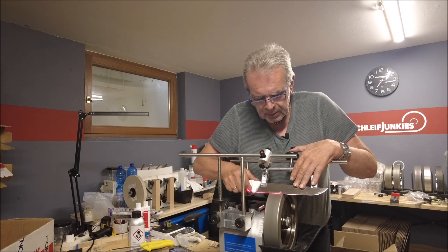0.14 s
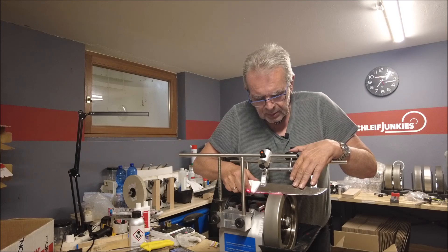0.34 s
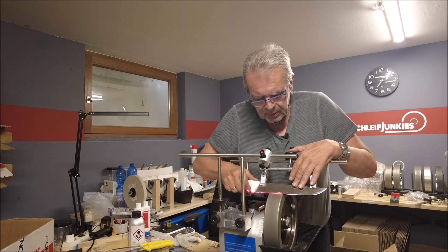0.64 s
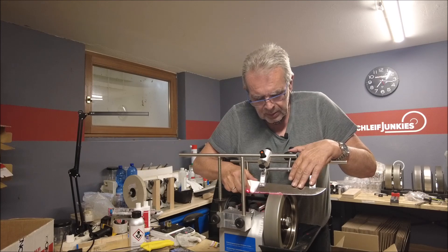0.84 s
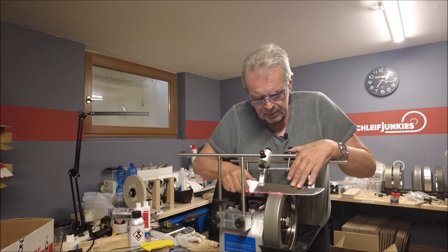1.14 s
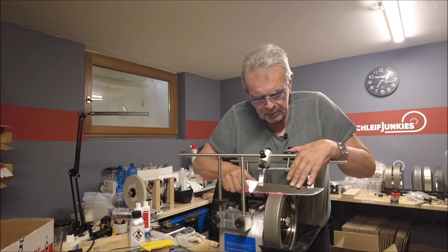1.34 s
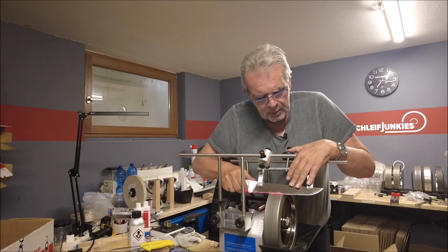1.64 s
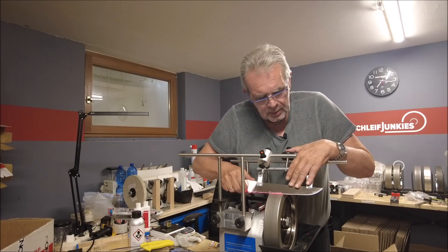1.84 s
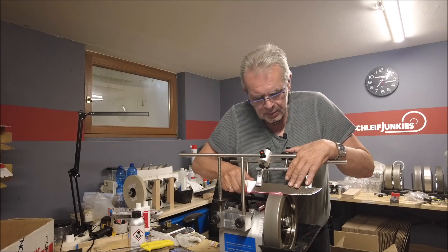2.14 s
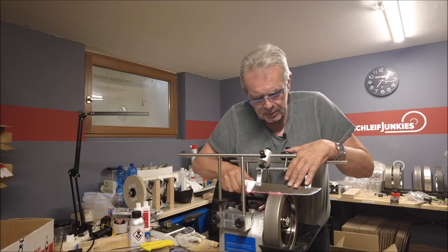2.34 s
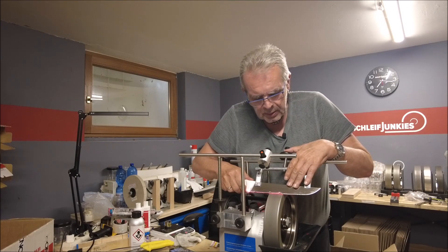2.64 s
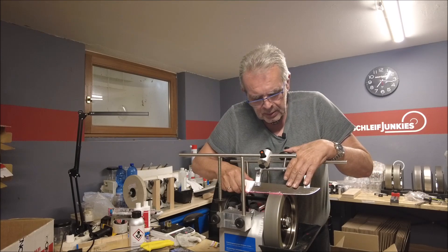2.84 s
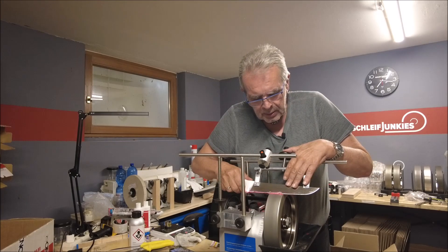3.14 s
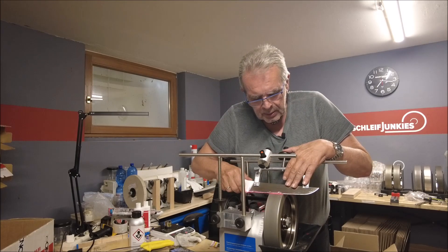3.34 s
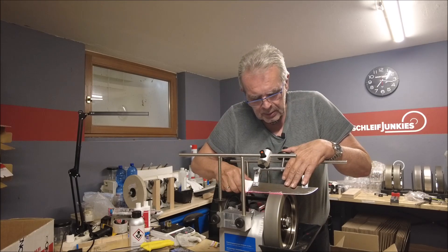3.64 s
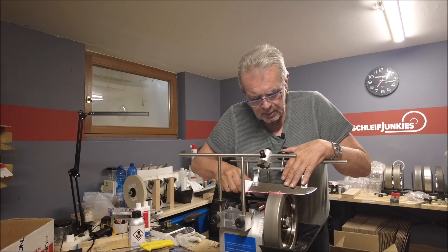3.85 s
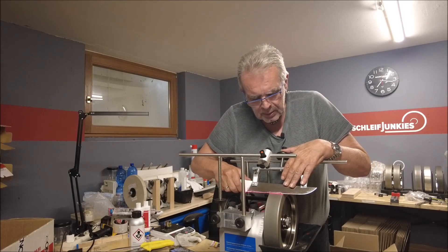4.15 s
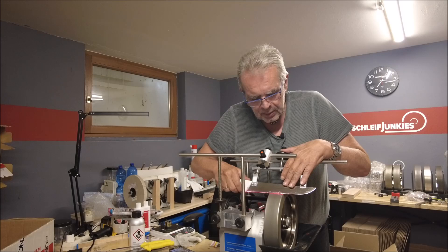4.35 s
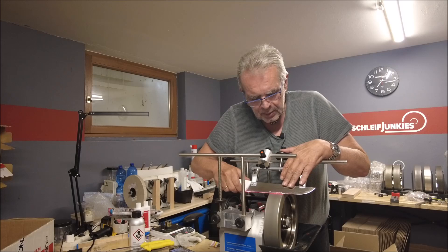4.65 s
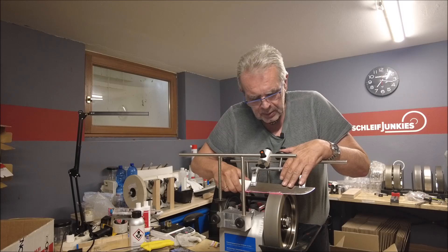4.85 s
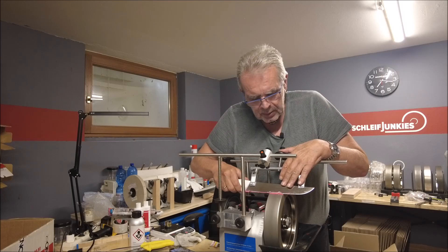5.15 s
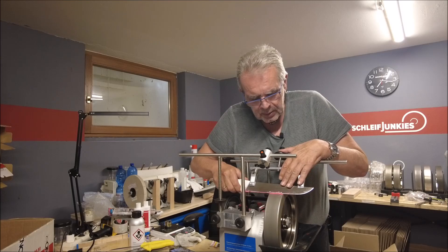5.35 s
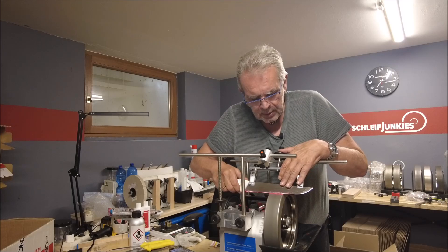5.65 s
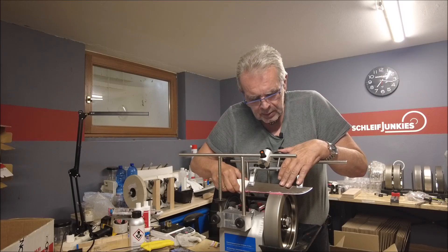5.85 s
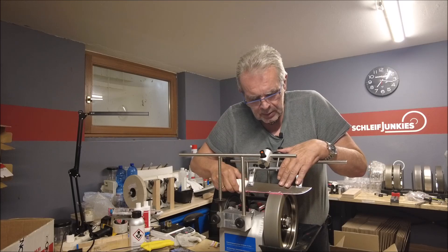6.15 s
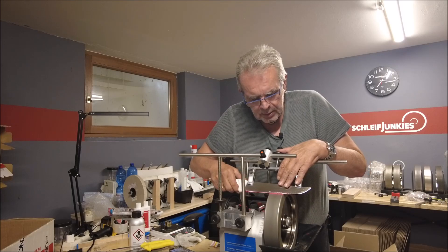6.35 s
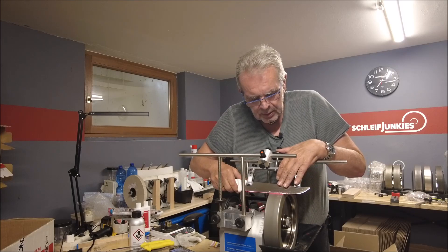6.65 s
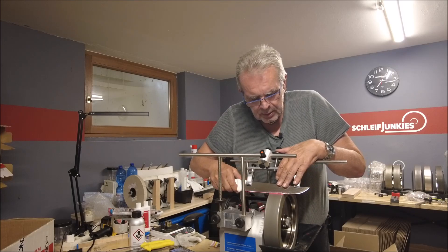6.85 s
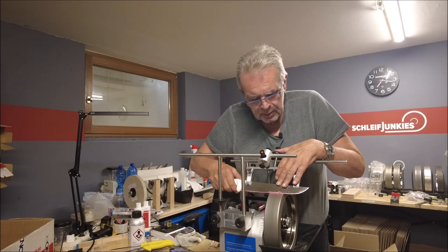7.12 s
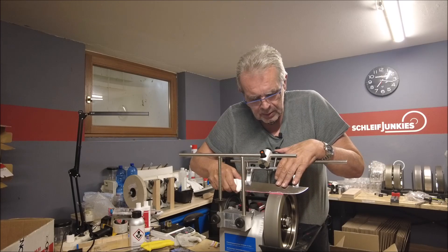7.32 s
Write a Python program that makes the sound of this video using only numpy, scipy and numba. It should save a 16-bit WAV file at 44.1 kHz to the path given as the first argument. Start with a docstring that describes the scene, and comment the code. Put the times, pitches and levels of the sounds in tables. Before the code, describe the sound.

A steel knife is ground on a turning wet stone for about seven and a half seconds, heard close and in mono in a small workshop. A bright wet hiss and gritty rasp run throughout, pulsing gently about every 0.7 seconds, with tiny recurring scratches and metallic resonances that swell and fade. A thin, chattering high whine is there from the start, peaks around 1 second and fades by 2. It returns near 3.8 seconds, rises in pitch, is loudest around 5.6 and wavers until it drops back at about 7. From around 5 seconds a lower blade tone glides upward, while a clear ringing note swells at the very end. Underneath, a low electric motor hum grows fuller between 2 and 4 seconds, along with soft housing rumble and faint room noise. A soft, dull double bump comes just after 4 seconds.

```python
"""A small workshop, where a long steel knife is drawn slowly across the stone of a wet grinder.
Impacts of grit excite the blade's modes, which swell, glide and fade as the contact point travels;
stick-slip friction drives one of them into a whine. Rotation makes the forcing periodic: the stone's
high side and coarse spots return on every turn. Underneath, the housing rumbles and the mains motor
hums. The sound is the same in both ears."""
import sys
import numpy as np
from scipy import signal
from scipy.fft import rfft, irfft, next_fast_len
from scipy.io import wavfile
from scipy.ndimage import uniform_filter1d
from numba import njit

SR = 44100
rng = np.random.default_rng(int(sys.argv[2]) if len(sys.argv) > 2 else 0)


def pcm_store(signal):
    """Save signal as 16-bit PCM."""
    levels = np.round(np.clip(np.atleast_2d(signal), -1, 1) * 32767)
    wavfile.write(sys.argv[1], SR, levels.astype(np.int16).T)


N = 329868

# course of the knife stroke: (time [s], relative hiss level [dB], relative rasp level [dB])
STROKE_LEVELS = [(0, -33, -42), (1.9, -30.5, -39.5), (3.4, -33, -40.5), (4.6, -31, -38), (5.8, -31.5, -39),
                 (6.7, -34, -37.5), (7.48, -33, -38.5)]
# spectra of the wet hiss and of the rasping edge: (frequency [Hz], relative spectral density [dB])
HISS_SPECTRUM = [(2500, -31), (4500, -1), (6000, -1.5), (6700, 0.5), (7150, -7.5), (7800, -1.5), (8500, -1),
                 (9500, 0), (10300, 3.5), (11500, 4.5), (12800, 1.5), (14000, -1.5), (15000, -5),
                 (16000, -26.5)]
RASP_SPECTRUM = [(200, -16.5), (330, -16), (750, -8.5), (1000, -11), (1250, -4.5), (1530, -15), (1850, -7),
                 (2150, 1), (2600, -1.5), (3100, 0), (4300, -1), (5400, -4), (6500, -10), (9000, -11)]
# blade modes that the contact point passes:
# (time of peak [s], reach either side [s], frequency [Hz], bandwidth [Hz], level [dB])
BLADE_MODES = [ (4.47, 1.93, 1073, 44, -50), (5.36, 3, 1230, 32, -48), (2.3, 1.1, 1270, 62, -52.5),
               (0.9, 2.0, 1403, 27, -53), (0.45, 2.9, 1745, 57, -50), (2.76, 1.25, 2200, 90, -43),
               (4.36, 2, 2305, 74, -40), (5.77, 1, 2670, 60, -44.5), (0.34, 0.95, 3340, 180, -45),
               (3.4, 1.7, 2991, 35, -45), (3.16, 1.7, 3190, 300, -38), (7.4, 0.46, 3420, 280, -40),
               (1.33, 1.78, 4110, 180, -32), (2.33, 0.44, 4490, 64, -33), (3.6, 2.48, 4597, 88, -35),
               (6.88, 1, 4660, 740, -35.5), (3.33, 1.9, 4950, 230, -39), (3.26, 3, 5290, 100, -42.5),
               (7.18, .55, 5290, 88, -36.5), (6.3, 1.1, 5550, 68, -42), (2.22, 1.37, 5925, 98, -38.5),
               (7.0, .9, 6180, 78, -46), (5, 2.4, 6860, 190, -47.5), (1.77, 1.6, 7760, 220, -43),
               (7.3, .7, 8180, 210, -43.5), (2.24, 1.6, 10330, 170, -38.5), (5.56, 0.93, 10200, 320, -40),
               (6.72, .8, 10820, 750, -32), (3.5, 0.84, 11150, 230, -39.5), (1.35, 0.83, 11600, 1000, -37),
               (4.84, 1.4, 12780, 500, -37.5)]
# two spells of chatter, each a list of (time [s], base frequency [Hz], relative level [dB])
WHINE_SPELLS = [
    [(0, 3620, -36), (.25, 3640, -31), (.82, 3694, -30), (.94, 3780, -23.5), (1.8, 3717, -33),
     (2.15, 3540, -43)],
    [(3.75, 3480, -40.5), (4.25, 3544, -34), (4.85, 3667, -29), (5.3, 3883, -22), (5.65, 3988, -18.5),
     (6.05, 3970, -21.5), (6.3, 3850, -24.5), (6.55, 3957, -21.5), (6.8, 3954, -21.5), (7.15, 3470, -38.5),
     (7.48, 3590, -35)],
]
# pressure profile of the out-of-round stone: (time into the turn [s], relative pressure [dB])
STONE_RUNOUT = [(.06, -3), (.22, -0.2), (.36, 0.6), (.45, 0), (.57, 4), (.65, 1.5)]
# how hard the high side bears on each successive turn: (multiple of the usual swing [ratio])
SWING_PER_TURN = [1.1, 0.82, .55, 0.84, 0.73, 1, 1.67, 1.15, 0.99, 0.78, 1.2]
# coarse spots on the stone: (time into the turn [s], relative level [dB])
COARSE_SPOTS = [(.216, -8.5), (.356, -5.5), (.384, 0.5), (.549, -3), (.576, -4.5), (.592, -4.5), (.628, -9),
                (.652, -1.5), (.672, -6)]
# brief dips in level: (time [s], relative depth [dB])
LEVEL_DIPS = [(.638, -9), (.77, -7), (.833, -11), (1.11, -8), (1.52, -8), (1.803, -27), (2.103, -30),
              (2.817, -9), (3.395, -7), (3.52, -7), (3.925, -8), (4.034, -7), (4.138, -13), (4.267, -7),
              (4.352, -8), (4.972, -9), (5.843, -16), (6.741, -9), (7.19, -7)]
# modes of the stone and its housing: (frequency [Hz], bandwidth [Hz], relative level [dB])
HOUSING_MODES = [(296.7, 32, -7), (386, 26, -2), (427, 18, -7.5), (502, 62, -4), (596, 40, -8),
                 (803, 116, -4)]
# soft knocks of the housing: (time [s], peak level [dB])
HOUSING_KNOCKS = [(4.05, -45), (4.13, -38)]
# fundamental of the motor's hum: (time [s], level [dB])
HUM_FUNDAMENTAL = [(0.15, -53), (0.71, -49), (3.48, -57), (5.72, -50), (7.35, -47.5)]
# its overtones: (harmonic number [1], level at 0 dB load [dB], sensitivity to load [dB/dB])
HUM_OVERTONES = [(2, -67.5, 1.2), (3, -46, 0.5), (4, -52, 0.86), (5, -56, 0.38), (6, -55, 0.41),
                 (7, -58, 1.2), (8, -47.5, 1.13), (10, -67, 2.1)]
# low rumble of the workshop: (frequency [Hz], relative spectral density [dB])
ROOM_SPECTRUM = [(20, 5.5), (32, -2), (50, -8), (75, -16), (110, -4), (160, -18.5), (250, -9.5), (400, -34)]

TURN_S, SPEED_UP_PER_S = .6843, .0008  # the stone's first period and its fractional gain in speed


def scrape(dip_gain, press_db, hits):
    """Abrasion makes broadband noise: fine grit hisses in the water film, coarse grit rasps the edge."""
    hiss_db, rasp_db = curves(STROKE_LEVELS)
    hiss = colour(grit(spread_db=2.0), HISS_SPECTRUM)
    hiss *= undb(hiss_db - 1.3 + 0.17 * press_db + 0.93 * walk(60))
    rasp = bench_echo(colour(grit(spread_db=2.5) + undb(-10) * crackle(), RASP_SPECTRUM))
    rasp *= undb(rasp_db + 3.5 + 0.5 * press_db + 1.7 * walk(160) + 0.72 * walk(22))
    abrasion = hiss + dip_gain ** 0.54 * rasp + scratches(hits) * undb(rasp_db)
    return dip_gain ** 0.72 * steel_ring(abrasion)


def grit(spread_db):
    """Dense grain impacts superpose into noise, a few much larger than the rest."""
    return unit(rng.standard_normal(N) * undb(spread_db * np.minimum(rng.exponential(size=N), 6)))


def crackle(per_s=28, decay_s=0.0008):
    """Grains break out of the stone as a Poisson process, each with a tiny decaying tick."""
    breaks = (rng.random(N) < per_s / SR) * rng.uniform(0.49, 1, N)
    envelope = signal.lfilter([1], [1, -np.exp(-1 / (decay_s * SR))], breaks)
    return unit(envelope * rng.standard_normal(N))


def scratches(hits, decay_s=0.0036, gain_db=15):
    """Impulsive excitation: each coarse spot makes a burst of rasp that decays exponentially."""
    envelope = bursts_at(hits, lambda age, i: np.exp(-age / decay_s))
    return undb(gain_db) * envelope * colour(rng.standard_normal(N), RASP_SPECTRUM)


def steel_ring(x, t60_s=0.06, ring_db=-10):
    """The blade's closely spaced modes act as a short reverberation, giving each scrape a metal grain."""
    t = np.arange(SR // 5) / SR
    tail = rng.standard_normal(len(t)) * undb(-60 * t / t60_s)
    return x + undb(ring_db) * signal.fftconvolve(x, tail / np.linalg.norm(tail))[:N]


def bench_echo(x, delay_s=.00293, share=0.27):
    """Comb filtering: a dull reflection travels a metre further and interferes with the direct sound."""
    dull = signal.sosfilt(signal.butter(1, 7000, fs=SR, output="sos"), x)
    return unit(x + share * np.interp(clock() - delay_s, clock(), dull, left=0))


def blade_modes(dip_gain, press_db, damped_hz=1500, soft_hz=6500, glide_above_hz=5100, glide_per_s=.035):
    """Modal coupling: each resonance swells while the stone bears on its antinode; high ones glide up."""
    t, out = clock(), np.zeros(N)
    flutter_db = 0.68 * walk(110)
    for peak_s, reach_s, hz, width, db in BLADE_MODES:
        near = np.abs(t - peak_s) < reach_s
        since = t[near] - peak_s
        bite_db = 0.59 * press_db / (1 + (hz / soft_hz) ** 4)  # high modes feel the pressure less
        drive = undb(bite_db + flutter_db + 1.9 * walk(14)) * rng.standard_normal(N)
        glide_hz = glide_per_s * max(hz - glide_above_hz, 0) * since
        ring = resonate(drive[near], hz + glide_hz, width, skirt=2.25)
        coupling = np.cos(np.pi / 2 * since / reach_s)
        dips = dip_gain[near] ** min(width / damped_hz, 1)  # narrow modes ring through the dips
        out[near] += undb(db) * coupling * dips * ring
    return out


def blade_notes(dip_gain, ring_hz=2052.6, rise_hz=1250, tip_s=7.44):
    """Lightly damped modes give two clear notes: towards the tip one swells, the other rises in pitch."""
    t = clock()
    near_tip = np.exp((t - tip_s) / 1.7)
    flare = np.exp((t - tip_s) / 0.15)  # the tip itself lands on the stone
    ring = resonate(dip_gain * rng.standard_normal(N), ring_hz, 6.9, skirt=11.0)
    rise = resonate(dip_gain * rng.standard_normal(N), rise_hz + 282 * near_tip, 35, skirt=4.1)
    ring_gain = undb(-41.7 + 6 * near_tip + 7.5 * flare)
    rise_gain = undb(-38) * np.clip((t - 5.22) / 1.32, 0, 1)
    return ring_gain * saturate(ring, size=11000) + rise_gain * saturate(rise, size=9000)


def whine(dip_gain, hz, chatter_hz=58.6, chatter_db=2.0):
    """Stick-slip bursts pump one resonance, a weaker one just below it and a faint octave."""
    phase = 2 * np.pi * np.cumsum(chatter_hz * (1 + 0.099 * walk(53))) / SR
    bursts = dip_gain * undb(chatter_db * np.sin(phase) + walk(170) + 1.9 * walk(30))
    main = resonate(bursts * rng.standard_normal(N), hz, 85, skirt=6.6)
    lower = resonate(bursts * rng.standard_normal(N), hz * .945, 78)
    octave = resonate(bursts * rng.standard_normal(N), 2 * hz, 210)
    return saturate(main + undb(-12) * lower + undb(-20) * octave, size=3000) * undb(-1.5)


def whine_course(press_db, fade_s=.22, hz_per_db=9.5, press_share=0.68):
    """Contact pressure modulates the whine's frequency and amplitude: more is sharper and louder."""
    t = clock()
    hz, db = curves([row for spell in WHINE_SPELLS for row in spell])
    fade = np.zeros(N)
    for spell in WHINE_SPELLS:
        inside_s = np.minimum(t - spell[0][0], spell[-1][0] - t)
        fade += np.clip(1 + inside_s / fade_s, 0, 1)
    return hz + hz_per_db * press_db, fade * undb(db + press_share * press_db)


def snags(hits, hz, swell_s=0.0028, peak_s=0.0044, gain_db=10):
    """Transient forcing: a coarse spot drags the whining resonance into a swell of a few milliseconds."""
    def swell(age, i):
        return np.exp(-np.square((age - peak_s) / swell_s)) * np.sin(2 * np.pi * hz[i] * age)
    return undb(gain_db) * bursts_at(hits, swell)


def saturate(x, size):
    """Friction feeds a vibration only up to a limit, so its rms over size samples holds steady."""
    return x / np.sqrt(uniform_filter1d(x ** 2, size=size) + 1e-6)


def pressure():
    """Runout modulates the pressure on the edge, in dB: one shape on every turn, deeper on some."""
    t = clock()
    s, db = np.transpose(STONE_RUNOUT)
    turned_s = t + SPEED_UP_PER_S * t ** 2 / 2
    high_side_s = s[np.argmax(db)] + TURN_S * np.arange(len(SWING_PER_TURN))
    swing = np.interp(turned_s, high_side_s, SWING_PER_TURN)
    return swing * np.interp(turned_s, s, db, period=TURN_S)


def spot_hits():
    """Rotation brings each coarse spot to the edge once a turn: (time [s], relative level [dB])."""
    turns = range(int(N / SR / TURN_S) + 1)
    hits = np.array([(turn * TURN_S + s, db) for turn in turns for s, db in COARSE_SPOTS])
    s, db = hits[hits[:, 0] < N / SR].T
    scatter_db = rng.uniform(-2.75, 2.5, len(s))
    return list(zip(s - SPEED_UP_PER_S * s ** 2 / 2, db + scatter_db))


def level_dips(half_width_s=.004, widen_s_per_db=.00045):
    """Amplitude modulation: the level dips briefly now and then, and deeper dips last longer."""
    t = clock()
    dips_db = sum(db * np.exp(-((t - s) / (half_width_s - widen_s_per_db * db)) ** 4)
                  for s, db in LEVEL_DIPS)
    return undb(dips_db)


def housing_rumble(dip_gain, level_db=-46):
    """Forced vibration: the rough stone shakes the modes of its shaft and housing."""
    modes = sum(undb(db) * resonate(rng.standard_normal(N), hz, width) for hz, width, db in HOUSING_MODES)
    return dip_gain * unit(modes) * undb(level_db)


def housing_knocks(hz=350, rise_s=0.01):
    """Damped oscillation: each dull bump swells and dies in the housing."""
    out = np.zeros(N)
    for s, db in HOUSING_KNOCKS:
        age = np.maximum(clock() - s, 0)
        envelope = age / rise_s * np.exp(1 - age / rise_s)
        out += undb(db) * envelope * np.sin(2 * np.pi * hz * age)
    return out


def motor(hum_hz=99.95, load_mid_s=2.52, load_rise_s=0.77):
    """Magnetic force pulses at twice the mains rate; its overtones grow as the knife loads the stone."""
    t = clock()
    fundamental_db, = curves(HUM_FUNDAMENTAL)
    load_db = -14 + 17 / (1 + np.exp((load_mid_s - t) / load_rise_s))
    phase = 2 * np.pi * hum_hz * t
    out = undb(fundamental_db + 0.7 * walk(12)) * np.sin(phase)
    for harmonic, db, sensitivity in HUM_OVERTONES:
        gain = undb(db + sensitivity * load_db + 1.2 * walk(7))
        out += gain * np.sin(harmonic * phase + rng.uniform(0, 2 * np.pi))
    return np.sqrt(2) * out


def room(level_db=-55):
    """Ambient noise: the workshop's faint, uneven low rumble."""
    return colour(rng.standard_normal(N), ROOM_SPECTRUM) * undb(level_db + 1.9 * walk(7))


def resonate(x, hz, width, skirt=2.2):
    """Two band-passes in cascade, the second skirt times as wide, give a steep resonance of rms 1."""
    hz = np.clip(hz + np.zeros(len(x)), 20, .45 * SR)
    return unit(band_pass(band_pass(x, hz, float(width)), hz, float(skirt * width)))


@njit
def band_pass(x, hz, width):
    """A damped oscillator in state-variable form, whose natural frequency may move."""
    y, band, low = np.empty(len(x)), 0., 0.
    for i in range(len(x)):
        step, damping = np.tan(np.pi * hz[i] / SR), width / hz[i]
        velocity = (band + step * (x[i] - low)) / (1 + step * (step + damping))
        band, low = 2 * velocity - band, low + 2 * step * velocity
        y[i] = damping * velocity
    return y


def colour(x, points):
    """Spectral shaping by (frequency [Hz], level [dB]) points, to rms 1."""
    hz, db = np.transpose(points)
    size = next_fast_len(N)
    bins_hz = np.maximum(np.fft.rfftfreq(size, 1 / SR), 1)
    gain = undb(np.interp(np.log(bins_hz), np.log(hz), db))
    return unit(irfft(rfft(x, size) * gain, size)[:N])


def bursts_at(hits, shape, size=1300):
    """Superposition of short sounds, one shape(age in s, sample of the hit) for each hit."""
    out, age = np.zeros(N + size), np.arange(size) / SR
    for s, db in hits:
        i = int(np.clip(s * SR, 0, N - 1))
        out[i:i + size] += undb(db) * shape(age, i)
    return out[:N]


def walk(rate):
    """Random fluctuation of rms 1 that takes a new course rate times a second."""
    steps = np.random.default_rng(rng.integers(1 << 30)).standard_normal(int(rate * N / SR) + 3)
    return unit(np.interp(clock() * rate, np.arange(len(steps)), steps))


def curves(table):
    """Linear interpolation of a table's columns over the times in its first."""
    s, *columns = np.transpose(table)
    return [np.interp(clock(), s, column) for column in columns]


def undb(db):
    """Decibels to amplitude ratio."""
    return 10 ** (np.asarray(db) / 20)


def unit(x):
    """Normalisation to rms 1."""
    return x / np.sqrt(np.mean(x ** 2))


def clock():
    """Time of every sample in s."""
    return np.arange(N) / SR


def scene():
    """Superposition: knife, stone, motor and room add at one listening point."""
    press_db, hits, dip_gain = pressure(), spot_hits(), level_dips()
    shallow_dips = dip_gain ** 0.24  # the strong tones carry on through the dips
    whine_hz, whine_gain = whine_course(press_db)
    knife = scrape(dip_gain, press_db, hits) + blade_modes(dip_gain, press_db) + blade_notes(shallow_dips)
    squeal = whine_gain * (whine(shallow_dips, whine_hz) + snags(hits, whine_hz))
    grinder = shallow_dips * motor() + housing_rumble(dip_gain) + housing_knocks()
    mono = knife + squeal + grinder + room()
    return np.array([mono, mono])


def record(dry, cutoff_hz=15900):
    """Band limiting: a steep elliptic low-pass removes the highest treble."""
    return signal.sosfilt(signal.ellip(12, .1, 90, cutoff_hz, fs=SR, output="sos"), dry)


dry = scene()
out = record(dry)
pcm_store(out)
```